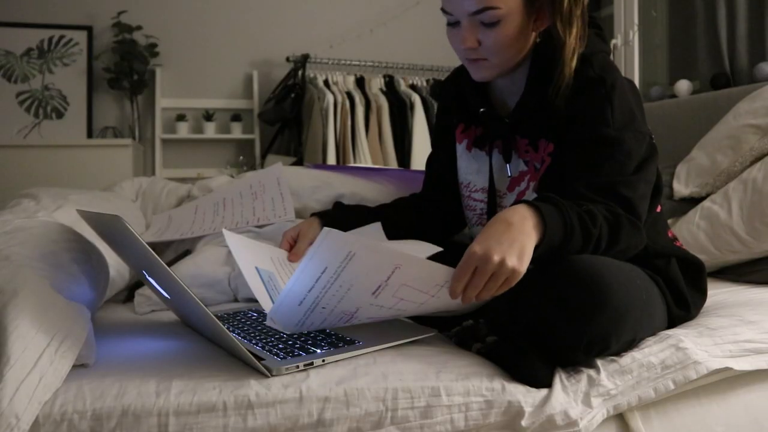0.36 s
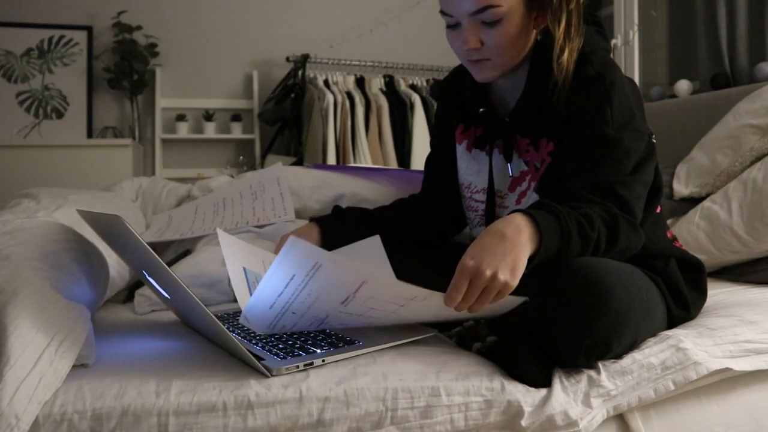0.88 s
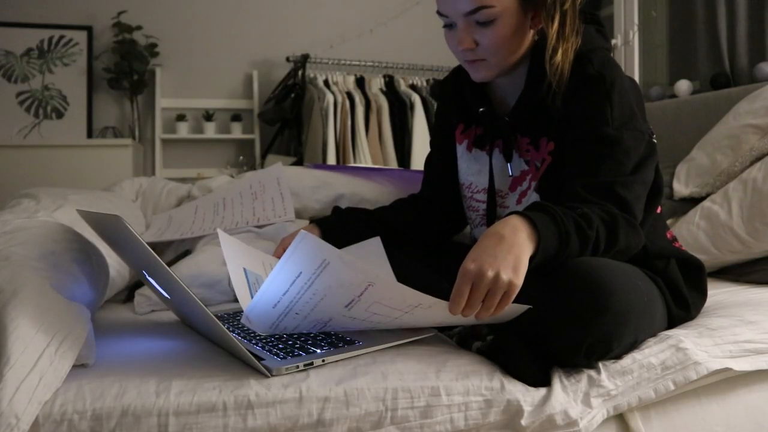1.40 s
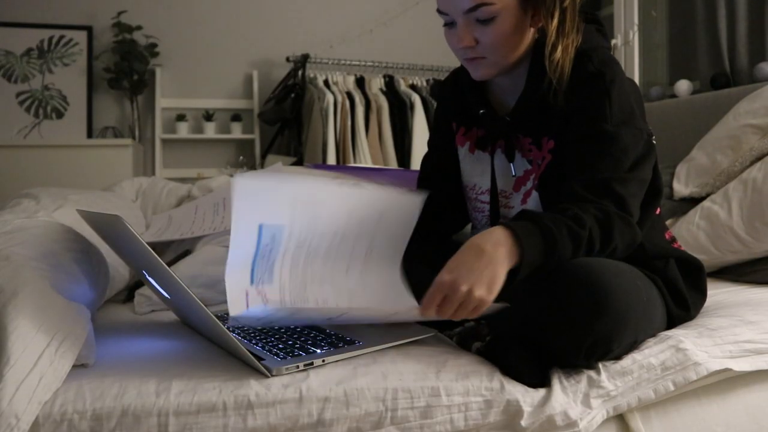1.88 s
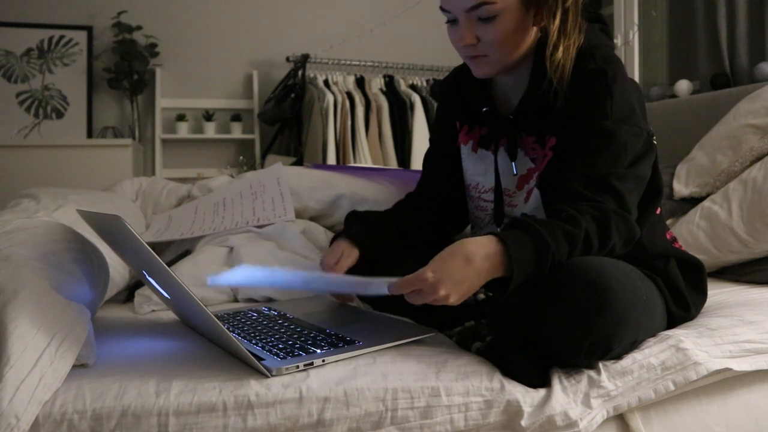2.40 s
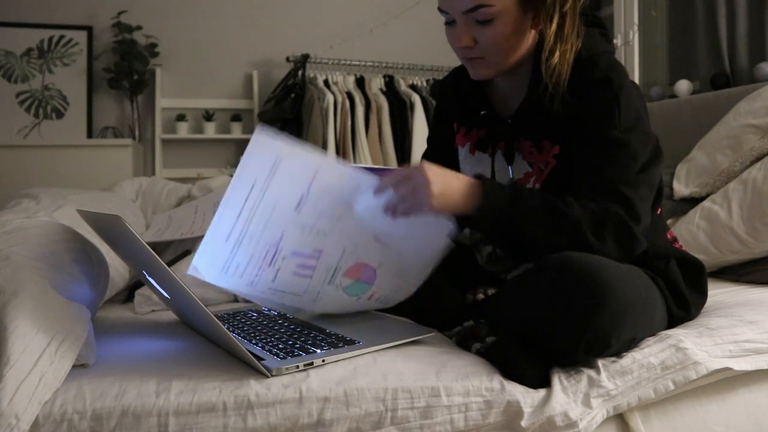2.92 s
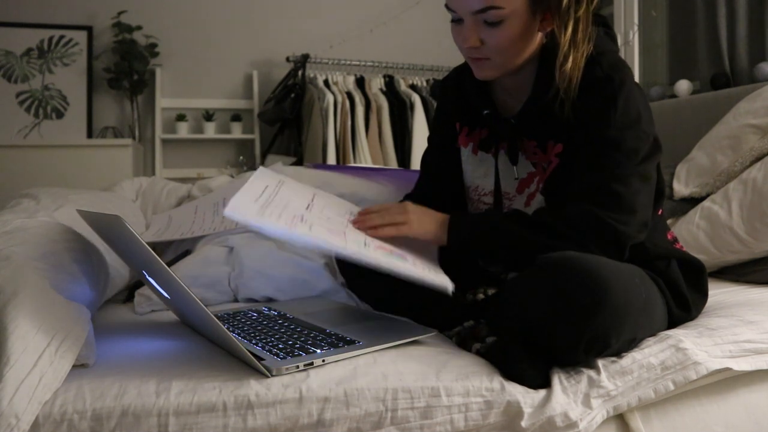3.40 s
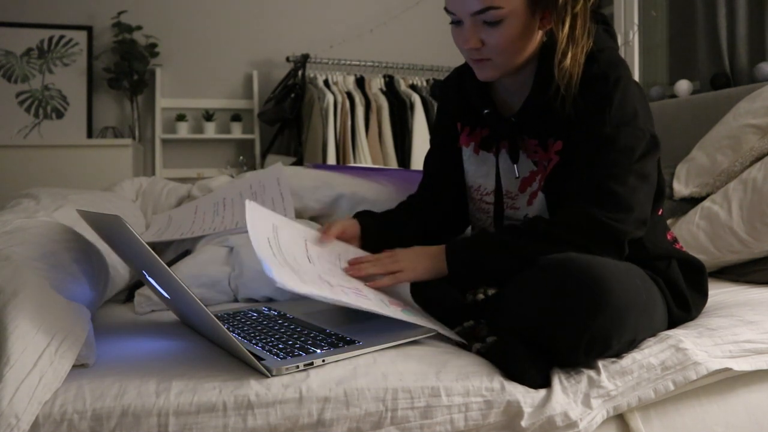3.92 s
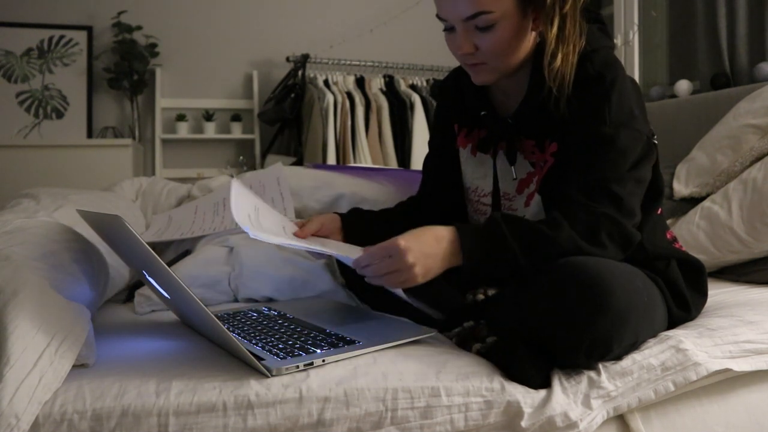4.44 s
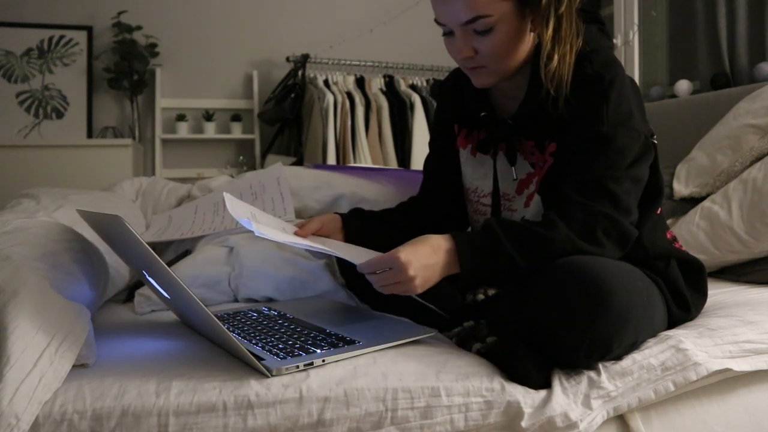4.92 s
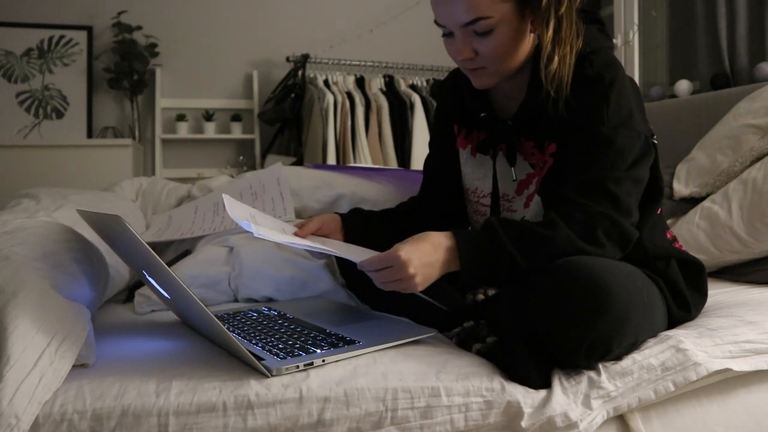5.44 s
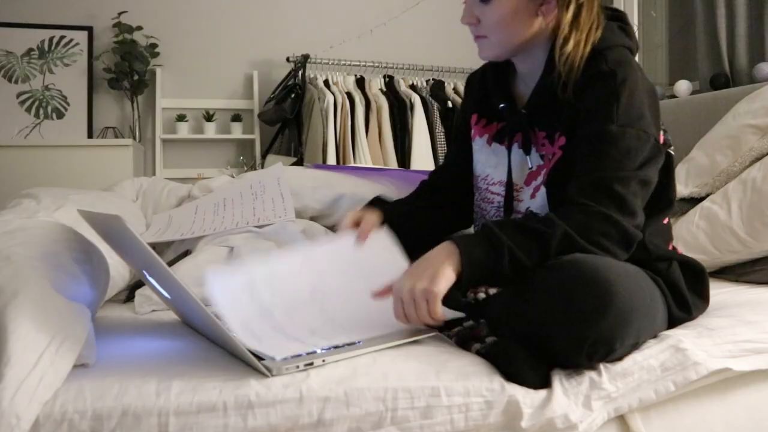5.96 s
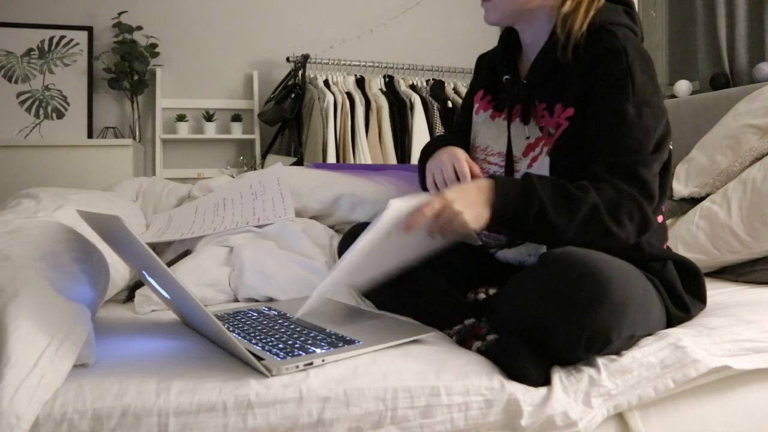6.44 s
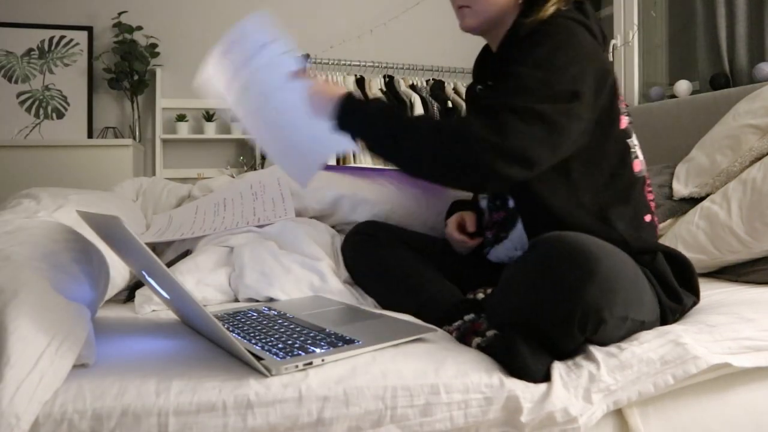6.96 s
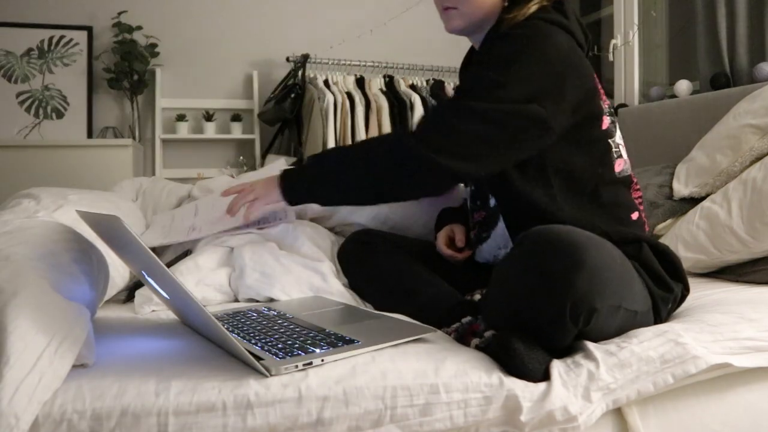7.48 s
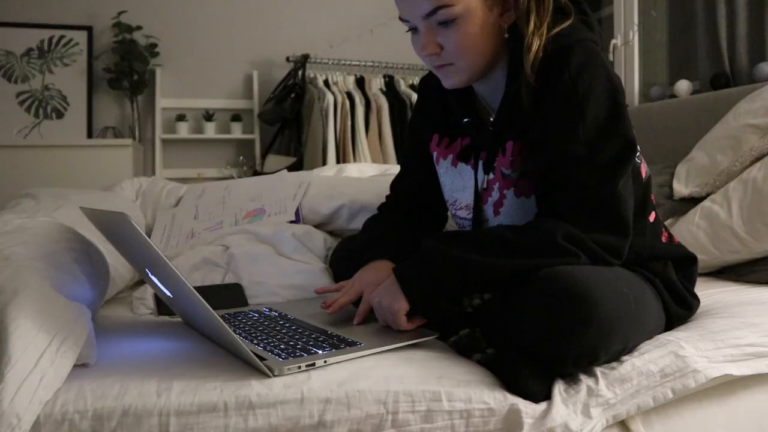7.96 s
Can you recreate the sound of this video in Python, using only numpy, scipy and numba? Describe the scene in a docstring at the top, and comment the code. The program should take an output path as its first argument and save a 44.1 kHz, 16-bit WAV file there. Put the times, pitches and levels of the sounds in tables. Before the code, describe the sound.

Several sheets of paper are handled close to a stereo microphone in a quiet bedroom. Crisp crackles and snaps come at once, then again around two and three seconds, where a page whips loudly. After a near-silent pause with only low hum and hiss, the paper rustles, flaps and cracks again, then slides softly onto bedding.

```python
"""Paper crackles and hisses at once, then snaps, as sheets are bent, turned and slid over each other on a bed.
Bent creases buckle into many short damped rings; a snap is a burst of them, a whip a two-toned crack.
Sliding sheets hiss and flapping sheets push air, both as filtered noise with a moving level; the room hums.
The hardest whips overload a limiter, which ducks everything and slowly lets go."""
import sys
import numpy as np
from scipy import signal
from scipy.fft import rfft, irfft, next_fast_len
from scipy.io import wavfile
from scipy.ndimage import uniform_filter1d, minimum_filter1d
from numba import njit

SR = 44100
rng = np.random.default_rng(int(sys.argv[2]) if len(sys.argv) > 2 else 0)


def level_to_linear(level):
    """Convert decibel levels to linear amplitude factors, elementwise."""
    exponent = np.asarray(level, float) / 20
    return 10 ** exponent


def dump(signal):
    """Clip the signal to [-1, 1] and save it as 16-bit WAV at the path in sys.argv[1]."""
    limited = np.clip(np.atleast_2d(signal).T, -1, 1)
    pcm = np.round(limited * 32767).astype(np.int16)
    wavfile.write(sys.argv[1], SR, pcm)


N = 357033  # samples

# creases that snap: t/s, level/dB (relative, before the sheet filter), ring f/Hz, length/s
CREASE_SNAPS = [(0.095, -16.5, 2200, .0043), (0.175, -13, 1670, 0.017), (0.205, -7.5, 1620, .015),
                (0.216, -5.5, 2460, 0.017), (0.232, -2, 2230, .016), (0.247, -6, 2010, 0.0032),
                (0.457, -25, 2570, 0.0041), (0.645, -16, 1250, 0.016), (0.673, -6.5, 1200, .014),
                (0.686, -1.5, 2100, .013), (0.735, 0, 2260, 0.0042), (0.773, -4.5, 2110, .0035),
                (0.889, -8.5, 2500, 0.0045), (0.995, -18, 840, 0.0032), (1.089, -5, 1860, 0.0044),
                (1.192, -23, 1290, 0.0036), (1.253, -11.5, 1750, 0.0045), (1.282, -9, 2400, 0.0034),
                (1.807, -14.5, 2090, 0.013), (1.827, -16, 1620, 0.0025), (1.867, -3.5, 1410, .015),
                (1.887, 0.5, 1930, 0.011), (1.926, -15, 1270, 0.011), (1.987, -2.5, 1360, .015),
                (2.009, -4.5, 2020, 0.011), (2.024, -7.5, 1960, 0.013), (2.088, -15.5, 1670, 0.0039),
                (2.311, -24, 2140, 0.013), (2.56, -37, 2190, 0.003), (2.917, -34, 1340, 0.0034),
                (2.961, -12, 1710, 0.0032), (2.971, -3, 2700, 0.0036), (2.976, -8, 1300, 0.0032),
                (2.991, -12.5, 1790, .014), (3.014, 3, 2460, 0.014), (3.243, -5, 2400, 0.0041),
                (3.353, -9.5, 1950, .024), (3.556, -20, 1520, 0.0037), (3.78, -11.5, 2000, 0.0031),
                (3.818, -11.5, 1510, .01), (3.875, -15.5, 1330, 0.0043), (3.996, -27, 837, 0.0037),
                (4.108, -22, 830, 0.015), (4.138, -23, 860, 0.018), (4.158, -21, 1700, 0.018),
                (4.215, -24, 2900, .0035), (5.792, -32, 2170, 0.0032), (6.147, -19, 2620, 0.01),
                (6.368, -14.5, 1880, 0.0036), (6.389, -18, 2120, 0.014), (6.402, -13, 2050, 0.016),
                (6.499, -30, 940, 0.011), (6.598, -11.5, 2580, 0.0029), (6.635, -14.5, 2160, .016),
                (6.729, -2.5, 2170, 0.0027), (6.75, -14.5, 2200, .014), (6.772, -11, 1880, 0.022),
                (6.806, -7, 1290, .015), (6.827, -9, 1940, 0.005), (7.047, -22, 1220, 0.0027),
                (7.075, -12.5, 2600, 0.0069), (7.316, -20.5, 1500, .014), (7.33, -22, 1690, 0.014),
                (7.357, -26, 1800, 0.017), (7.408, -26, 2130, .016)]
# response of the path from paper to microphone: f/Hz, gain/dB
SHEET_RESPONSE = [(150, -12), (400, -3), (900, -3), (2000, 2.5), (3500, 2.5), (5000, -4), (7000, -26),
                  (12000, -46), (16000, -45)]


def unit(x):
    """Normalisation: scale to an rms of 1."""
    return x / np.sqrt(np.mean(x ** 2))


def colour(x, points):
    """Linear filtering: multiply the spectrum by gains (f/Hz, gain/dB) interpolated over log frequency."""
    hz, db = np.transpose(points)
    size = next_fast_len(N)
    bins_hz = np.arange(size // 2 + 1) * SR / size + 1  # 1 Hz up, to avoid log 0
    gain = level_to_linear(np.interp(np.log(bins_hz), np.log(hz), db))
    return irfft(rfft(x, size) * gain, size)[:N]


def in_band(x, lo_hz, hi_hz):
    """Band-level normalisation: scale so that the part between two frequencies has an rms of 1."""
    bandpass = signal.butter(4, [lo_hz, hi_hz], "band", fs=SR, output="sos")
    band = signal.sosfilt(bandpass, x)
    return x / np.sqrt(np.mean(band ** 2))


def walk(rate):
    """Low-passed noise: random levels held 1 / rate seconds, smoothed twice, with an rms of 1."""
    k = int(SR / rate)
    steps = np.repeat(rng.standard_normal(N // k + 1), k)
    smooth = uniform_filter1d(uniform_filter1d(steps, k), k)
    return unit(smooth[:N])


def swells(start, hold, db, rise_db_s, fall_db_s):
    """Exponential growth and decay: power of each gesture, in 1 ms steps, rising, holding, then falling."""
    t = np.arange(0, N / SR + 1e-3, 1e-3)[:, None]
    rise_db = rise_db_s * np.maximum(start - t, 0)
    fall_db = fall_db_s * np.maximum(t - start - hold, 0)
    return level_to_linear(2 * (db - rise_db - fall_db))


def per_sample(x):
    """Linear interpolation from millisecond steps to samples."""
    return np.interp(np.arange(N) / SR, np.arange(len(x)) * 1e-3, x)


def tails(s, db, t60, weight=1):
    """Exponential decay: power that rises in 1.5 ms at each moment and falls 60 dB in its t60."""
    t = np.arange(N) / SR
    power = np.zeros(N)
    for start, size, fade in zip((s * SR).astype(int), weight * level_to_linear(2 * db), np.clip(t60, .02, .6)):
        stop = min(N, start + int(fade * SR))
        since = t[:stop - start]
        onset = np.sin(np.minimum(since / .0015, 1) * np.pi / 2) ** 4
        power[start:stop] += size * level_to_linear(-120 * since / fade) * onset
    return power


@njit
def rings(length, at, hz, t60, size, turn):
    """Free vibration: a sum of damped sinusoids, each a complex number turned and shrunk every sample."""
    out = np.zeros(length)
    for k in range(len(at)):
        pole = np.exp((2j * np.pi * hz[k] - np.log(1000) / t60[k]) / SR)
        z = size[k] * np.exp(1j * turn[k])
        for i in range(at[k], min(length, at[k] + int(t60[k] * SR))):
            out[i] += z.imag
            z *= pole
    return out


def bending():
    """Elastic energy release: power and centre frequency of the crackle as sheets bend and settle."""
    # the sheets are bent: start t/s, hold/s, crackle level/dB (nominal), crackle centre f/Hz
    bend_table = [(0.0, 0.091, -29.5, 2020), (0.216, 0.048, -22, 1010), (0.245, 0.079, -27, 2200),
                  (0.413, 0.17, -41.5, 2010), (0.57, .1, -33.5, 1950), (.72, .16, -34.5, 2050),
                  (0.933, .02, -30, 2280), (0.988, 0.18, -41.5, 1830), (1.723, .06, -45, 2000),
                  (1.867, 0.067, -24.5, 1880), (1.954, 0.037, -21.5, 1830), (2.064, 0.053, -34, 1470),
                  (2.188, 0.042, -44.5, 1280), (2.32, .01, -37.5, 1790), (2.587, 0.12, -46, 2020),
                  (2.928, 0.017, -34, 1790), (3.06, 0.048, -31, 2400), (3.161, .01, -20.5, 2510),
                  (3.187, 0.14, -26, 3180), (3.36, 0.056, -34, 1780), (3.673, 0.07, -38, 2120),
                  (3.803, 0.43, -44, 1700), (4.138, 0.026, -35, 1340), (4.215, .14, -46, 1900),
                  (5.876, 0.047, -42, 1570), (6.042, .07, -37, 2300), (6.141, .02, -32, 2430),
                  (6.207, 0.078, -38.5, 1770), (6.498, .03, -31.5, 1580), (6.629, .06, -29.5, 1860),
                  (6.813, .01, -22, 1440), (6.893, 0.032, -41, 1880), (6.967, 0.19, -46, 2050),
                  (7.356, 0.037, -37, 1490), (7.416, .1, -35.5, 2000), (7.6, 0.096, -50.5, 2400),
                  (7.818, .07, -48, 2690)]
    start, hold, bend_db, bend_hz = np.transpose(bend_table)
    bends = swells(start, hold, bend_db, rise_db_s=215, fall_db_s=217) + 1e-30
    # each snap sets off more crackle as the sheet settles, longer after a longer snap
    at_s, db, hz, length = np.transpose(CREASE_SNAPS)
    settle = at_s + length, db - 13.5, 0.058 + 3.4 * length
    power = per_sample(bends.sum(1)) + tails(*settle)
    # mean frequency weighted by power, so the loudest bend or snap sets the pitch
    centre_hz = (per_sample(bends @ bend_hz) + tails(*settle, hz)) / power
    return power, centre_hz


def crackle(centre_hz, per_s=2200., cycles=6.9, octaves=0.67, uneven=1.26, clump_db=1.0):
    """Buckling instability: small pops all over the sheet, many faint and few strong, in clumps."""
    place, strength, phase = rng.random((int(per_s * N / SR), 3)).T
    at = (place * (N - 1)).astype(int)
    hz = np.clip(centre_hz[at] * 2 ** (octaves * rng.standard_normal(len(at))), 200, 12000)
    size = level_to_linear(-uneven * np.log(strength + 1e-4))  # power-law strengths
    pops = rings(N, at, hz, cycles / hz, size, 2 * np.pi * phase)
    return in_band(colour(pops, SHEET_RESPONSE), 500, 6500) * level_to_linear(clump_db * walk(70))


def snaps(s, db, hz, length, octaves=0.25, cycles=10.4, count=36):
    """Snap-through: a crease lets go in a burst of buckles spread widely around its ring frequency."""
    draw = rng.random((len(s), count, 3))
    place, spread, phase = draw[..., 0], draw[..., 1], draw[..., 2]
    length = np.clip(length, .001, .04)[:, None]
    at = ((s[:, None] + place * length) * SR).astype(int)
    # the shorter the snap, the more its buckles pile up, so each is smaller; later ones are weaker
    size = level_to_linear(db[:, None] - 11.0 - 6.1 * place) * np.sqrt(length / 0.0033)
    detune = octaves * np.log(spread / (1 - spread) + 1e-6)
    pitch = np.clip(hz[:, None] * 2 ** detune, 200, 9000).ravel()
    return rings(N, at.ravel(), pitch, cycles / pitch, size.ravel(), 2 * np.pi * phase.ravel())


def creases():
    """Radiation through the sheet: all crease snaps shaped by the path from paper to microphone."""
    return colour(snaps(*np.transpose(CREASE_SNAPS)), SHEET_RESPONSE)


def whips():
    """Impulsive excitation: a sheet whips taut in a two-toned crack with a spray of buckles behind it."""
    # t/s, first ring level/dB, first ring f/Hz, second ring f/Hz, second ring level/dB
    # (levels relative, before the sheet filter)
    whip_table = [(0.2669, 10.5, 3110, 1800, 1.5), (3.0093, 9.5, 2230, 3460, 0.5),
                  (6.8362, 9, 1970, 495, 13.5)]
    s, db, hz, second_hz, second_db = np.transpose(whip_table)
    t60 = np.full(len(s), 0.0072)  # s
    phase = 0 * s
    at = (s * SR).astype(int)
    crack = rings(N, at, hz, t60, level_to_linear(db), phase) + rings(N, at, second_hz, t60, level_to_linear(second_db), phase)
    spray = snaps(s, db - 2.0, hz, 0.76 * t60, octaves=0.48)
    return colour(crack + spray, SHEET_RESPONSE)


def flapping():
    """Air displacement: a flapping sheet pushes low-frequency noise in puffs."""
    # puffs: t/s, level/dB (nominal, before the random waver)
    puff_table = [(0.0, -36.5), (.108, -41), (.256, -30), (.404, -38), (.678, -29.5), (.8, -39.5),
                  (1.006, -32), (1.094, -34), (1.19, -45), (1.282, -37), (1.821, -28.5), (1.884, -24.5),
                  (2.014, -25), (2.14, -31), (2.324, -36), (2.98, -22), (3.153, -24), (3.316, -35),
                  (3.372, -30.5), (3.686, -40), (3.87, -38), (4.14, -38), (4.332, -45.5), (5.87, -43),
                  (6.14, -36.5), (6.375, -30), (6.42, -31), (6.506, -27), (6.626, -31), (6.756, -27),
                  (6.814, -22.5), (7.104, -49), (7.37, -38), (7.5, -40), (7.7, -48)]
    # spectrum of a puff: f/Hz, gain/dB
    puff_response = [(100, -9.5), (200, -7), (400, 0), (700, -2), (1100, -6), (2000, -75)]
    s, db = np.transpose(puff_table)
    power = per_sample(swells(s, 0, db, rise_db_s=698, fall_db_s=161).sum(1))
    noise = in_band(colour(rng.standard_normal(N), puff_response), 150, 854)
    return noise * np.sqrt(power) * level_to_linear(2.83 * walk(30))


def sliding():
    """Friction noise: one sheet rubs another; two independent hisses share one moving level."""
    # one sheet slides over another: start t/s, hold/s, level/dB (nominal), fall/(dB/s)
    rub_table = [(0.0, 0.11, -44, 200), (0.233, 0.075, -42.5, 93), (.54, 0.19, -45.5, 205),
                 (0.848, 0.1, -44, 200), (1.09, .02, -53, 150), (1.882, 0.095, -36.5, 113),
                 (2.297, .02, -56, 100), (2.584, 0.02, -48.5, 280), (2.7, 0.023, -54.5, 200),
                 (2.983, 0.11, -38.5, 150), (3.174, 0.16, -27.5, 170), (3.498, 0.49, -49.5, 98),
                 (3.693, 0.057, -55, 58), (4.145, 0.029, -49.5, 400), (4.243, .03, -50, 148),
                 (5.827, 0.22, -51.5, 100), (6.065, .08, -41.5, 99), (6.397, 0.11, -47, 150),
                 (6.624, 0.081, -41.5, 300), (6.753, 0.076, -35, 500), (6.87, 0.13, -53.5, 100),
                 (7.067, 0.015, -44.5, 400), (7.34, .12, -50, 100), (7.466, .07, -44.5, 300),
                 (7.613, 0.28, -45, 903)]
    # an edge catches and starts a hiss at once: t/s, level/dB (nominal)
    flick_table = [(0.8894, -54), (1.8243, -38), (2.5696, -42), (4.2168, -36.5), (5.7945, -40),
                   (6.3664, -41.5), (6.5946, -38), (7.0751, -51), (7.3124, -50)]
    # spectrum of the hiss: f/Hz, gain/dB
    hiss_response = [(800, -18), (1600, 5.5), (2500, 10.5), (3500, 10.5), (5000, 7.5), (7000, -1.5),
                     (11000, -7.5), (13500, -15), (16000, -28)]
    start, hold, db, fall_db_s = np.transpose(rub_table)
    slides = per_sample(swells(start, hold, db, 254, fall_db_s).sum(1))
    flick_s, flick_db = np.transpose(flick_table)
    flicks = tails(flick_s, flick_db, np.full(len(flick_s), 0.19))
    held = level_to_linear(2 * -62.5)  # sheets held still whisper faintly
    grip = np.sqrt(slides + held + flicks) * level_to_linear(1.9 * walk(55))
    slide, slide_elsewhere = (in_band(colour(rng.standard_normal(N), hiss_response), 4450, 20000) * grip
                              for _ in range(2))
    return slide, slide_elsewhere


def room(x):
    """Reverberation: convolution with a near wall echo and a short, soft tail, different on each side."""
    t = np.arange(int(.4 * SR)) / SR
    t60_s, tail_db, wall_s, wall_db = 0.24, -8.5, .008, -27.5
    tail = rng.standard_normal((2, len(t))) * level_to_linear(-60 * t / t60_s) * (t > .004)
    tail *= level_to_linear(tail_db) / np.sqrt(np.sum(tail[0] ** 2))
    tail[1] = 0.71 * tail[0] + 0.51 * tail[1]  # partly coherent sides
    tail[:, int(wall_s * SR)] += level_to_linear(wall_db)
    return signal.fftconvolve(x[None], tail, axes=1)[:, :N]


def paper():
    """Mid-side superposition: all paper sounds add; the treble reaches the two ports by unlike paths."""
    # side relative to mid: f/Hz, gain/dB
    spread_response = [(100, -29), (400, -46), (1500, -31.5), (3000, -12), (5000, -4), (8000, 4.5),
                       (15000, -3)]
    power, centre_hz = bending()
    whip = whips()
    bent = crackle(centre_hz) * np.sqrt(power) + flapping() + creases() + whip
    slide, slide_elsewhere = sliding()
    scatter = rng.standard_normal(300) * np.exp(-np.arange(300) / 60.)
    scatter /= np.sqrt(np.sum(scatter ** 2))
    scattered = np.convolve(bent, scatter)[:N]
    side = colour(scattered + slide_elsewhere - 0.13 * slide, spread_response)
    mid = bent + slide
    # the paper sits a little to the right
    direct = (mid + side * np.array([[1], [-1]])) * level_to_linear([[-.6], [.6]])
    # a whip beams at the microphones, so the walls get less of it
    return direct + room(mid - 0.23 * whip)


def hum():
    """Tonal superposition: steady low sinusoids, each wavering a little in level and phase."""
    # f/Hz, rms level/dB (nominal, before the waver), waver/dB
    tone_table = [(49.5, -44.5, 2), (97.2, -52.5, 3), (120.3, -38.5, 0.25), (151.5, -48.5, 2.5),
                  (251.4, -49, 0.5), (548, -57, 2.2)]
    t = np.arange(N) / SR
    total = np.zeros(N)
    for hz, db, waver_db in tone_table:
        level = np.sqrt(2) * level_to_linear(db + waver_db * walk(6))
        turns = hz * t + rng.random() + 0.026 * waver_db * walk(4)
        total += level * np.sin(2 * np.pi * turns)
    return total


def air():
    """Broadband noise: room rumble and microphone hiss, the hiss strongest in the left-right difference."""
    # relative spectral densities of mid and side: f/Hz, level/dB per Hz
    mid_density = [(20, -20), (45, -5), (100, 1), (160, -2), (260, -0.5), (400, -5.5), (700, -8),
                   (1200, -11), (3000, -17), (7900, -30.5), (11500, -40), (15000, -48)]
    side_density = [(18, -56), (30, -26), (163, -0.5), (247, -1.5), (281, 0), (597, -1.5), (716, -2),
                    (1300, -4), (4420, -12), (12200, -29.5), (15000, -38)]
    mid = unit(colour(rng.standard_normal(N), mid_density)) * level_to_linear(-41.5)
    side = unit(colour(rng.standard_normal(N), side_density)) * level_to_linear(-40)
    return mid + side * np.array([[1], [-1]])


def scene():
    """Linear superposition: paper over hum and air."""
    return paper() + hum() + air()


@njit
def limiter(level_db, ceiling_db, step_db):
    """Gain control: the gain drops at once to hold the ceiling and climbs back at a steady rate."""
    gain_db, g = np.empty(len(level_db)), 0.
    for i in range(len(level_db)):
        g = min(0., g + step_db, ceiling_db - level_db[i])
        gain_db[i] = g
    return gain_db


def roll_off(x):
    """The treble ends steeply here."""
    return signal.sosfilt(signal.butter(12, 16360, fs=SR, output="sos"), x)


def record(dry):
    """Dynamic range limiting: the gain follows the level over about a millisecond; the last peaks clip."""
    peak = np.max(np.abs(dry), axis=0)
    level_db = 20 * np.log10(uniform_filter1d(peak, size=36) + 1e-9)
    gain_db = limiter(level_db, -2., 14 / SR)  # ceiling in dB, recovery of 14 dB/s
    gain_db = uniform_filter1d(minimum_filter1d(gain_db, size=44), size=22)
    offset = .0015  # constant
    mix = np.clip(dry * level_to_linear(gain_db) + offset, -1, 1)
    return roll_off(mix)


dry = scene()
out = record(dry)
dump(out)
```